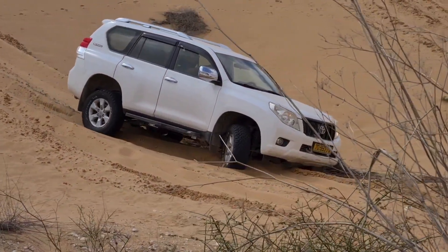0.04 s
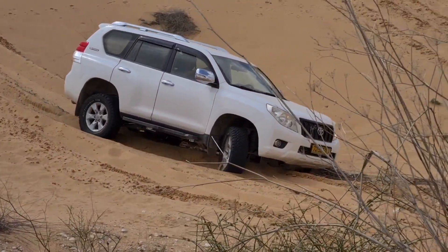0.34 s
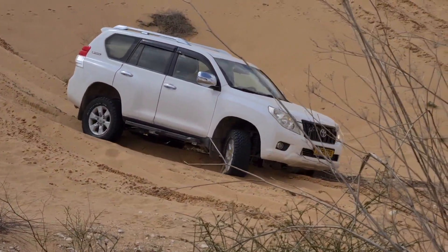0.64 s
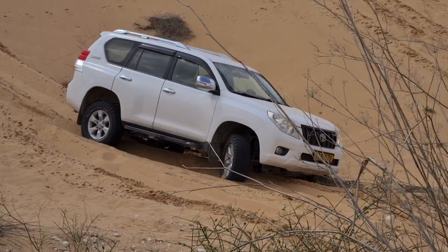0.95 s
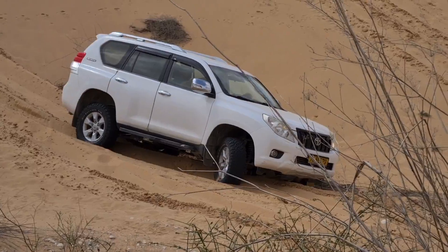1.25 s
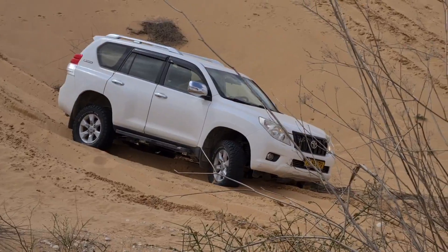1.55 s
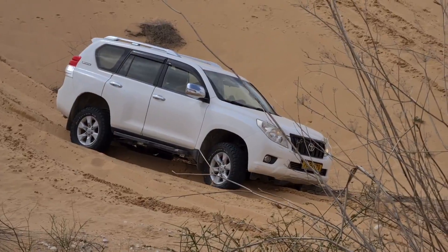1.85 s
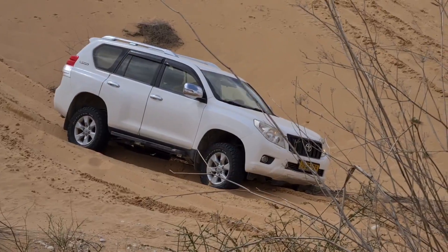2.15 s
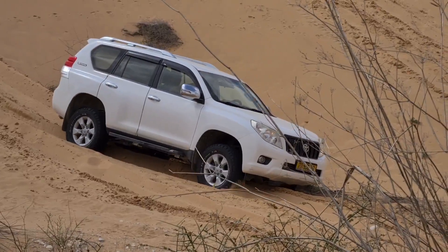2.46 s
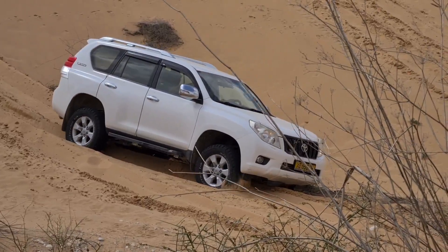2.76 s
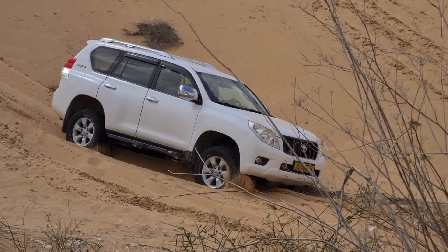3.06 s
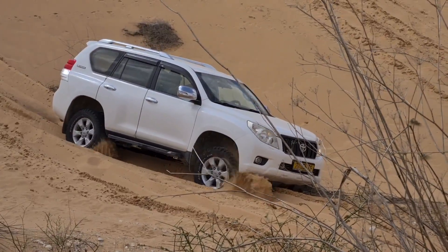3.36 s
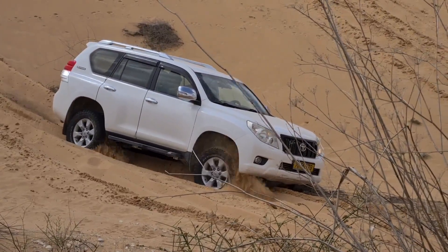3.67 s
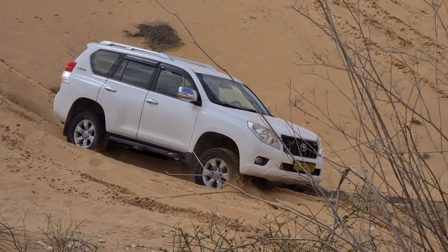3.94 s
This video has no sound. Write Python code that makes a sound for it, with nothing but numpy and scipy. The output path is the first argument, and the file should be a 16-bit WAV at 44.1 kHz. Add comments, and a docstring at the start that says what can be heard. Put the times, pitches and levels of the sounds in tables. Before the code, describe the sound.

An off-roader's diesel engine throbs quietly outdoors, slightly to the right, with a brief crunch of grit. It then revs loudly with a faint rising whistle and spraying sand, while gusts thump the microphone and the engine eases off.

```python
"""A four-cylinder turbo-diesel off-roader idles on a dune, a little to the right: the exhaust throbs,
the engine block clatters, the injectors tick, the belts hiss and grit crunches under the tyres.
After about two seconds it revs up: the fan roars, the turbo whistles upward and the wheels churn sand.
In the last second the gears whine and gusts buffet mainly the left microphone; then the revs fall."""
import sys
import numpy as np
from scipy import signal
from scipy.fft import rfft, irfft
from scipy.io import wavfile
from scipy.ndimage import uniform_filter1d, minimum_filter1d

SR = 44100
rng = np.random.default_rng(int(sys.argv[2]) if len(sys.argv) > 2 else 0)


def wrap_up_sound(samples):
    """Save the sound to the file named by the first command line argument, as 16-bit audio."""
    columns = np.atleast_2d(samples).T
    # keep every value between -1 and 1, then stretch to whole-number steps
    tamed = np.clip(columns, -1, 1)
    steps = np.round(tamed * 32767).astype(np.int16)
    wavfile.write(sys.argv[1], SR, steps)


N = 176400
TIME = np.arange(N) / SR
FREQS = np.maximum(np.arange(N // 2 + 1) * SR / N, 1)

# how the car reaches the two microphones: (frequency [Hz], left minus right [dB], likeness [0-1])
STEREO_PICTURE = [(60, -1.5, 1), (300, -0.5, 0.97), (694, -1, 0.95), (1350, -1.5, 0.74), (2390, -2, 0.51),
                  (4070, -10.5, 0.43), (6700, -1.5, 0.17), (9300, -10, 0.04), (15000, -6, 0.94)]


def exhaust(speed, cycle, waver_db=2):
    """Each firing sends one puff, a little different every time, booming through the pipe."""
    # loudness as the engine works harder: (time [s], level [dB])
    load = [(0, -41.5), (.4, -39.5), (.75, -44.5), (1.15, -44.5), (1.9, -52.5), (2.18, -42.5), (2.32, -38),
            (2.5, -24), (2.65, -20.5), (2.88, -28), (3.15, -18.5), (3.28, -22), (3.45, -25), (3.63, -17),
            (3.77, -32), (3.88, -25.5), (4, -33)]
    # how the pipe boosts or weakens each pitch: (frequency [Hz], gain [dB])
    pipe = [(25, -29), (42, -23), (57, 2.5), (80, 2.5), (110, 2.5), (135, -1), (160, -8.5), (182, -10),
            (215, -7), (280, -10), (450, -33)]
    # the tones that make up a puff: (multiple of the firing rate, level [dB])
    puff_tones = [(1, 0.5), (2, -1), (3, 0.5), (4, -7), (5, -18), (6, -35), (7, -14.5), (8, -27),
                  (9, -25.5), (10, -9.5)]
    puffs = 0
    for multiple, db in puff_tones:
        level = from_db(db + at_hz(pipe, multiple * speed) + waver_db * drift(20.4))
        puffs = puffs + level * np.cos(2 * np.pi * multiple * cycle)
    strength = uniform_filter1d(per_firing(cycle + .5, spread_db=1.76), size=300)
    return puffs * strength * from_db(in_time(load))


def rumble(cycle, throb=0.13):
    """The engine and drive train make a rough low noise that swells with each firing."""
    # tone colour: (frequency [Hz], relative level [dB])
    spectrum = [(20, -10), (50, 3), (110, 0.5), (160, -1), (220, -4.5), (285, -5), (330, -12.5), (390, -13),
                (480, -15), (700, -27.5), (1500, -48.5)]
    # loudness: (time [s], level [dB])
    levels = [(0, -44), (.7, -42.5), (1.3, -42.5), (2.2, -42), (2.6, -34.5), (3.1, -28), (3.45, -28.5),
              (3.8, -32.5), (4, -35.5)]
    pulsing = 1 + throb * np.cos(2 * np.pi * cycle)
    return wide_noise(at_hz(spectrum, FREQS)) * from_db(in_time(levels)) * pulsing


def clatter(speed, cycle, level_db=-47.5):
    """A knock from the burning fuel and a weaker one from the valves shake the block at each firing."""
    # tone colour: (frequency [Hz], relative level [dB])
    spectrum = [(150, 10), (280, -5.5), (450, 3), (600, -3), (900, 3.5), (1350, -5), (2000, -3),
                (2600, -15.5), (4500, -19), (6500, -28), (8000, -55.5)]
    knocks = .17  # a steady floor between the knocks
    for offset, share in ((0.44, 1), (0.887, .6)):  # fuel, then valves; offsets are parts of a cycle
        strength = share * per_firing(cycle - offset, spread_db=3.5)
        knocks = knocks + strength * pulse(cycle - offset, speed, rise_s=0.0046, decay_s=0.0075)
    return from_db(level_db) * unit_level(knocks) * bay_noise(spectrum)


def fan(speed, cycle, lag_s=0.075, db_per_octave=21.5, flutter_db=2.5, throb=0.06):
    """The cooling fan's roar grows with the engine speed, a moment late."""
    # tone colour: (frequency [Hz], relative level [dB])
    spectrum = [(200, -45), (380, -0.5), (560, -9), (800, -3), (1050, 5.5), (1500, 2), (1850, -1),
                (2500, -12.5), (3500, -17.5), (7000, -48)]
    # resonances of the fan's cover and grille: (frequency [Hz], width [Hz], boost [dB])
    shroud = [(374, 8.3, -7), (645, 8, 23.5), (1021, 15, 6.5), (1146, 80, 1.5), (1499, 23, 3.5),
              (1444, 97, 2.5), (1765, 42, 6), (1700, 26, -4)]
    octaves = np.log2(np.interp(TIME - lag_s, TIME, speed) / 60.8)  # zero at 60.8 firings a second
    level = from_db(-36 + db_per_octave * octaves + flutter_db * drift(27))
    pulsing = 1 + throb * np.cos(2 * np.pi * cycle)
    return level * pulsing * wide_noise(at_hz(spectrum, FREQS) + resonance_db(shroud))


def whine(lower_ratio=0.78, lower_db=-1, width_hz=17):
    """Two pairs of gears sing under load, one lower than the other."""
    # the upper tone: (time [s], pitch [Hz], level [dB])
    course = [(2.9, 1250, -74), (3.15, 1370, -43.5), (3.33, 1400, -56), (3.46, 1440, -35.5),
              (3.56, 1500, -46.5), (3.7, 1510, -44), (3.82, 1430, -66), (4, 1350, -51.5)]
    hz = in_time(course)
    tones = wavering_tone(hz, width_hz) + from_db(lower_db) * wavering_tone(hz * lower_ratio, width_hz)
    return from_db(in_time(course, column=2)) * tones * (TIME > course[0][0])


def hiss(flutter_db=1.46):
    """The belts and the air drawn into the engine hiss all the time."""
    # tone colour: (frequency [Hz], relative level [dB])
    spectrum = [(500, -30.5), (1500, 1), (2550, 1), (3100, 5.5), (4000, -1), (5000, -3), (6400, -3),
                (7100, -11.5), (7900, -30), (12000, -19), (16000, -37)]
    # loudness: (time [s], level [dB])
    levels = [(0, -55), (.9, -54.5), (1.12, -53.5), (1.5, -55), (2.1, -53), (2.6, -49), (3.1, -49.5),
              (3.45, -48), (3.8, -53), (4, -52)]
    return from_db(in_time(levels) + flutter_db * drift(40)) * bay_noise(spectrum)


def block_ring(speed, cycle, offset=0.486, level_db=-59, pitch_hz=1300, half_width_hz=250):
    """Each firing also rings one strong resonance of the engine block."""
    knocks = pulse(cycle - offset, speed, rise_s=.003, decay_s=.005)
    knocks *= per_firing(cycle - offset, spread_db=0.5)
    band_db = -20 * np.log10(1 + ((FREQS - pitch_hz) / half_width_hz) ** 2)
    return from_db(level_db) * unit_level(knocks) * wide_noise(band_db)


def injectors(speed, cycle, offset=.38):
    """The fuel injectors give one short, bright, soft-edged tick per firing."""
    # tone colour: (frequency [Hz], relative level [dB])
    spectrum = [(2000, 3), (4000, 14), (6300, -10.5), (7800, -4), (10000, -2), (12700, 3.5), (14000, -1),
                (15500, 6.5)]
    # loudness: (time [s], level [dB])
    levels = [(0, -62), (1.35, -60.5), (1.6, -88), (2, -74), (2.2, -59.5), (3, -77), (4, -56)]
    ticks = pulse(cycle - offset, speed, rise_s=.006, decay_s=.0045)
    ticks *= per_firing(cycle - offset, spread_db=4.5)
    softened = unit_level(uniform_filter1d(ticks, size=260))
    return from_db(in_time(levels)) * softened * wide_noise(at_hz(spectrum, FREQS))


def turbo(flutter_db=1.5):
    """An airy, fluttering whistle climbs as the turbo spins up."""
    # the whistle: (time [s], pitch [Hz], level [dB])
    course = [(2.18, 5100, -90), (2.25, 5180, -66), (2.37, 5550, -66), (2.47, 6550, -73), (2.6, 7650, -74),
              (2.72, 8720, -64), (2.85, 9700, -62), (2.94, 10430, -58), (3.0, 11250, -65),
              (3.1, 12550, -72), (3.27, 14350, -68), (3.42, 15600, -80)]
    level = from_db(in_time(course, column=2) + flutter_db * drift(25))
    sounding = (TIME > course[0][0]) & (TIME < course[-1][0])
    return level * wavering_tone(in_time(course), width_hz=56) * sounding


def sand(grain_db=7):
    """The spinning wheels throw a grainy spray of sand."""
    # tone colour: (frequency [Hz], relative level [dB])
    spectrum = [(1500, -9), (5500, 46), (7500, -8), (9000, 10), (12000, 13), (13500, -39), (16000, 0)]
    # loudness: (time [s], level [dB])
    levels = [(0, -92), (2.1, -124), (2.5, -71), (2.95, -76), (3.4, -60.5), (3.62, -70.5), (3.75, -70),
              (4, -72)]
    return from_db(in_time(levels) + grain_db * drift(500)) * wide_noise(at_hz(spectrum, FREQS))


def grit():
    """Grit crunches under the tyres in short bursts, each around its own pitch."""
    # the bursts: (time [s], level [dB], half length [s], pitch [Hz], half width [octaves])
    crunches = [(0.422, -59, 0.0018, 6000, .7), (1.09, -58, 0.033, 4000, 0.69),
                (1.113, -44, 0.012, 456, 0.12), (1.194, -47, 0.031, 2500, 0.5),
                (1.209, -39.5, 0.0055, 2260, 0.86), (1.212, -42, 0.023, 427, 0.37),
                (2.077, -57, 0.0037, 5950, 1), (2.17, -66, .006, 7040, .1), (3.828, -52.5, .003, 7260, 0.5),
                (3.975, -55, 0.0015, 7100, 0.21)]
    sound = 0
    for at_s, db, half_s, hz, octaves in crunches:
        band_db = -20 * np.log10(1 + (np.log2(FREQS / hz) / octaves) ** 4)
        sound = sound + swell(at_s, db, half_s) * wide_noise(band_db)
    return sound


def wind(breeze_db=-51, right_gust_db=-13):
    """A light breeze brushes both microphones; gusts hit mainly the left, hard buffets only the left."""
    # tone colour of breeze and gusts: (frequency [Hz], relative level [dB])
    spectrum = [(15, -15), (35, 1.5), (62, 11), (100, 3), (160, -11.5), (300, -24.5), (600, -37),
                (1500, -69)]
    # gusts on the left: (time [s], level [dB])
    gust_levels = [(0, -29.5), (.15, -33.5), (.45, -48.5), (.8, -72), (.95, -52), (2.05, -46), (2.3, -70),
                   (2.6, -36), (2.75, -39), (2.95, -27), (3.25, -24.5), (3.45, -16), (3.62, -13.5),
                   (3.75, -25.5), (3.9, -19), (4, -29)]
    # hard buffets: (time [s], level [dB], half length [s])
    hits = [(3.07, -20, 0.047), (3.395, -8, 0.013), (3.446, -11.5, 0.011), (3.534, -8.5, 0.013),
            (3.91, -24.5, .02)]
    # tone colour of a buffet: (frequency [Hz], relative level [dB])
    hit_spectrum = [(15, -19), (40, -14), (62, 2), (90, -9), (135, -6.5), (220, -16.5), (400, -25),
                    (800, -39.5), (2000, -76)]
    gust, breeze = from_db(in_time(gust_levels)), from_db(breeze_db)
    buffets = sum(swell(*hit) for hit in hits) * eddies(hit_spectrum)
    left = np.hypot(gust, breeze) * eddies(spectrum) + buffets
    right = np.hypot(from_db(right_gust_db) * gust, breeze) * eddies(spectrum)
    return np.array([left, right])


def eddies(spectrum, evenness=0.59):
    """The low noise of swirling air, with its random swells partly evened out."""
    swirl = noise(at_hz(spectrum, FREQS))
    power = uniform_filter1d(uniform_filter1d(swirl ** 2, size=1300), size=900) + 1e-9
    return unit_level(swirl / power ** (evenness / 2))


def bay_noise(spectrum):
    """Noise coloured by the hollow space around the engine."""
    # resonances of the engine bay: (frequency [Hz], width [Hz], boost [dB])
    bay = [(183, 13, 9), (255, 20, 9.5), (633, 34, 6), (795, 11, 9.5), (1057, 52, -3), (1270, 60, 9),
           (1407, 92, 6.5), (1743, 37, 7), (2090, 46, 4.5), (2347, 29, 7.5), (2600, 80, 1.5),
           (3020, 630, 2.5), (4340, 90, 3), (4750, 140, 5), (5060, 38, 5.5)]
    return wide_noise(at_hz(spectrum, FREQS) + resonance_db(bay))


def resonance_db(resonances, ripple_db=3.35, ripple_step_hz=60.6):
    """Peaks and dips from resonances, plus a fine treble ripple from sound bouncing between panels."""
    grid = np.arange(0, SR / 2, ripple_step_hz)
    ripple = np.interp(FREQS, grid, rng.standard_normal(size=2000)[:len(grid)])
    treble = FREQS ** 2 / (FREQS ** 2 + 1500 ** 2)
    peaks = sum(db / (1 + (2 * (FREQS - hz) / width) ** 2) for hz, width, db in resonances)
    return ripple_db * ripple * treble + peaks


def from_right(sound, left_lag_s=0.00016):
    """Sound from the right reaches the left microphone later and quieter."""
    half_db = at_hz(STEREO_PICTURE, FREQS) / 2
    delay = np.exp(-2j * np.pi * FREQS * left_lag_s)
    return irfft(rfft(sound) * np.array([from_db(half_db) * delay, from_db(-half_db)]), N)


def per_firing(cycle, spread_db):
    """A random strength for each firing, at most spread_db up or down."""
    return from_db(spread_db * (2 * rng.random(size=256) - 1))[np.floor(cycle).astype(int)]


def pulse(cycle, speed, rise_s, decay_s):
    """A loudness curve that rises and dies away once per firing."""
    age_s = cycle % 1 / speed
    return (1 - np.exp(-age_s / rise_s)) ** 2 * np.exp(-age_s / decay_s)


def swell(at_s, db, half_s):
    """A bell-shaped loudness curve."""
    return from_db(db) * np.exp(-.5 * ((TIME - at_s) / half_s) ** 2)


def wavering_tone(hz, width_hz):
    """A tone of level 1 whose strength and phase flutter."""
    phase = 2 * np.pi * np.cumsum(hz) / SR
    return unit_level((1 + drift(width_hz)) * np.sin(phase) + drift(width_hz) * np.cos(phase))


def wide_noise(shape_db):
    """Stereo noise of level 1: the two sides are alike in the bass and differ in most of the treble."""
    alike = at_hz(STEREO_PICTURE, FREQS, column=2)
    white = rfft(rng.standard_normal((3, N)))  # shared, left, right
    blend = np.sqrt(alike) * white[0] + np.sqrt(1 - alike) * white[1:]
    return unit_level(irfft(blend * from_db(shape_db), N))


def noise(shape_db):
    """Mono noise of level 1 with the given tone colour."""
    return unit_level(irfft(rfft(rng.standard_normal(N)) * from_db(shape_db), N))


def drift(rate_hz):
    """A random wobble of typical size 1, mostly slower than rate_hz."""
    return noise(-20 * np.log10(1 + (FREQS / rate_hz) ** 2))


def in_time(rows, column=1):
    """Read a time table at every sample."""
    rows = np.array(rows)
    return np.interp(TIME, rows[:, 0], rows[:, column])


def at_hz(rows, hz, column=1):
    """Read a frequency table, joining its points on an octave scale."""
    rows = np.array(rows)
    return np.interp(np.log(hz), np.log(rows[:, 0]), rows[:, column])


def from_db(db):
    """Turn decibels into a gain."""
    return 10 ** (np.asarray(db) / 20)


def unit_level(x):
    """Scale to an average (RMS) level of 1."""
    return x / np.sqrt(np.mean(x ** 2) + 1e-20)


def scene():
    """The car, with its engine speed setting the beat, and the wind."""
    # engine speed: (time [s], firing rate [Hz])
    revs = [(0.0, 26.47), (1.3, 26.71), (2.0, 26.89), (2.22, 26.41), (2.35, 32.91), (2.5, 40.08),
            (2.63, 45.01), (2.75, 45.41), (2.87, 43.49), (3.0, 48.19), (3.15, 52.83), (3.3, 58.66),
            (3.45, 62.39), (3.55, 57.25), (3.65, 48.47), (3.78, 38.6), (3.88, 37.0), (4.0, 35.0)]
    speed = in_time(revs)
    cycle = -.17 + np.cumsum(speed) / SR  # counts up by one per firing
    engine = exhaust(speed, cycle) + rumble(cycle) + clatter(speed, cycle) + injectors(speed, cycle)
    engine += fan(speed, cycle) + hiss() + turbo()
    car = engine + whine() + sand() + grit() + block_ring(speed, cycle)
    to_edge_s = np.minimum(TIME, TIME[::-1])
    fade = np.sin(np.pi / 2 * np.minimum(1, to_edge_s / .004)) ** 2
    return from_right(fade * car) + fade * wind()


def record(dry, ceiling=.98, hold_s=.03, cutoff_hz=15750):
    """A smooth limiter turns the loudest buffets down; a filter cuts the highest treble."""
    hold = int(hold_s * SR)
    peak = np.abs(dry).max(axis=0) + 1e-9
    gain = minimum_filter1d(np.minimum(1, ceiling / peak), size=hold)
    gain = uniform_filter1d(uniform_filter1d(gain, size=hold // 2), size=hold // 2)
    treble_cut = signal.ellip(12, .1, 80, cutoff_hz, fs=SR, output="sos")
    return signal.sosfilt(treble_cut, dry * gain)


dry = scene()
out = record(dry)
wrap_up_sound(out)
```